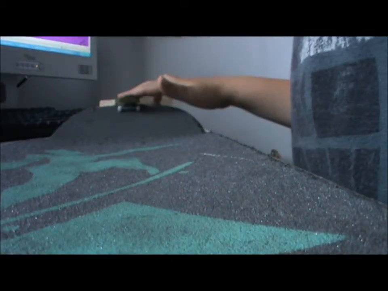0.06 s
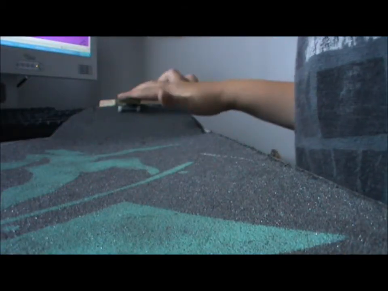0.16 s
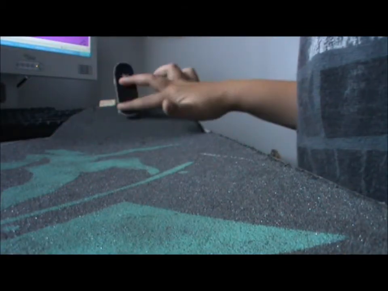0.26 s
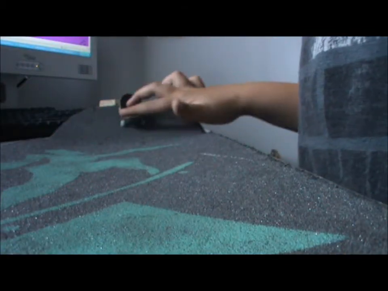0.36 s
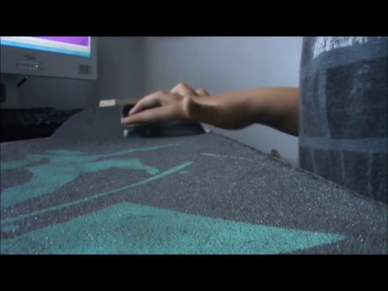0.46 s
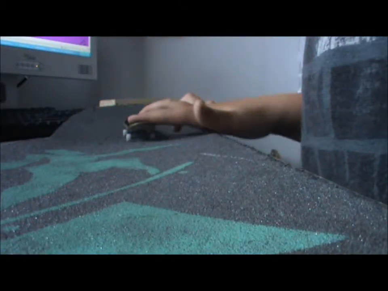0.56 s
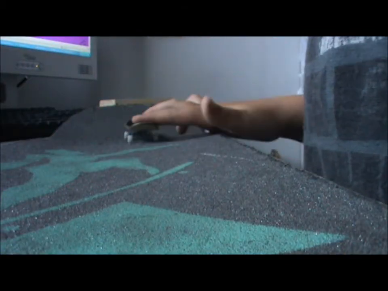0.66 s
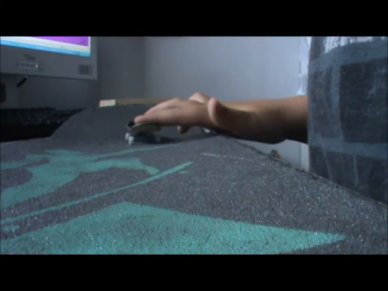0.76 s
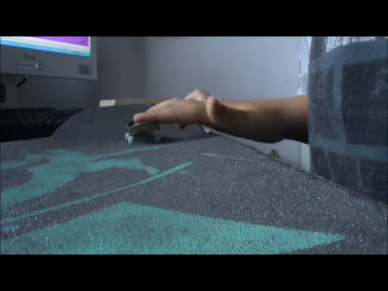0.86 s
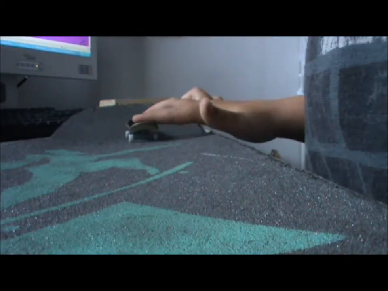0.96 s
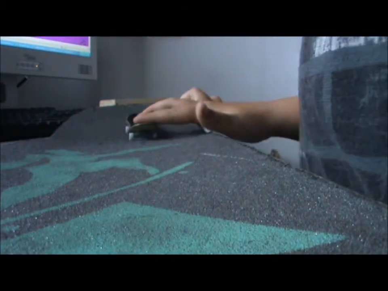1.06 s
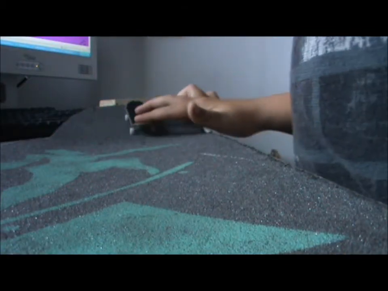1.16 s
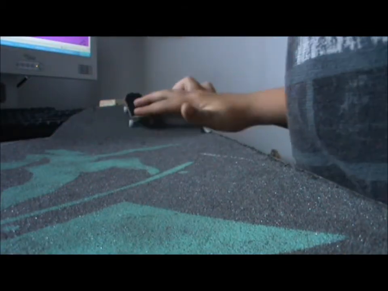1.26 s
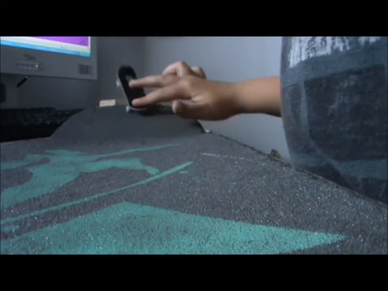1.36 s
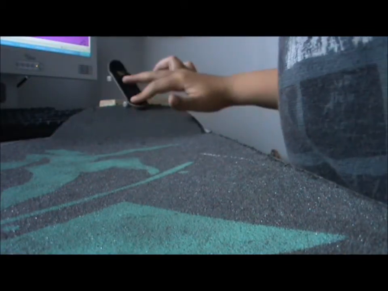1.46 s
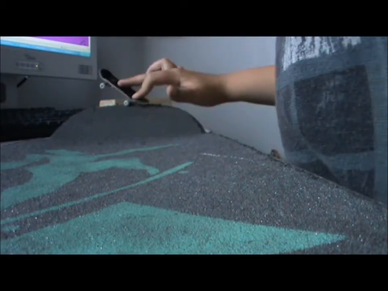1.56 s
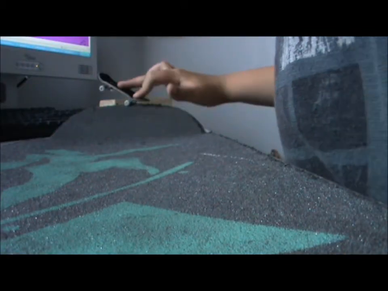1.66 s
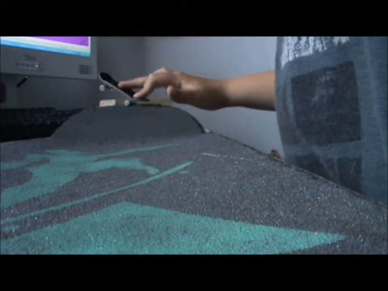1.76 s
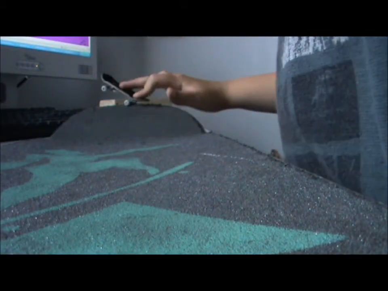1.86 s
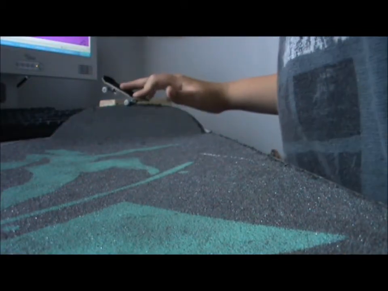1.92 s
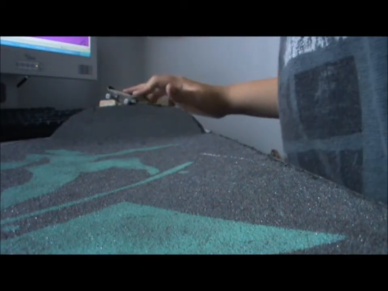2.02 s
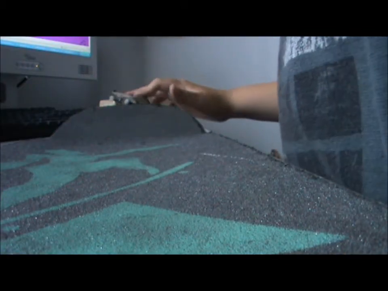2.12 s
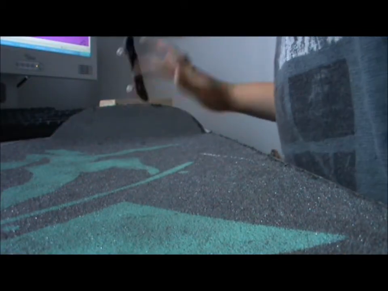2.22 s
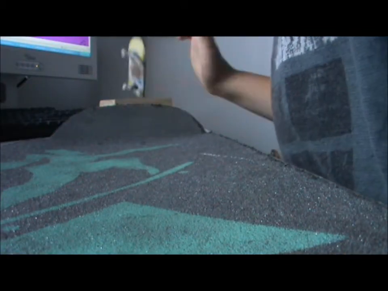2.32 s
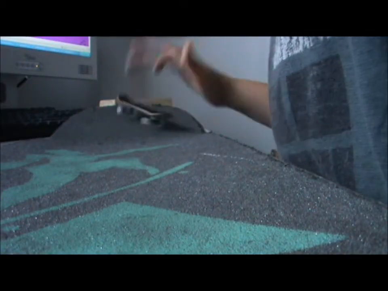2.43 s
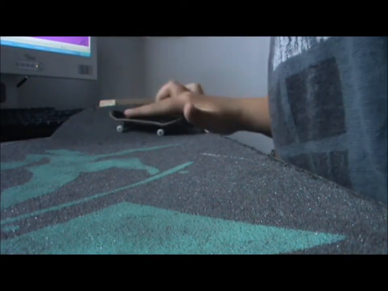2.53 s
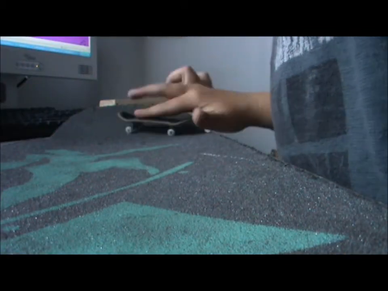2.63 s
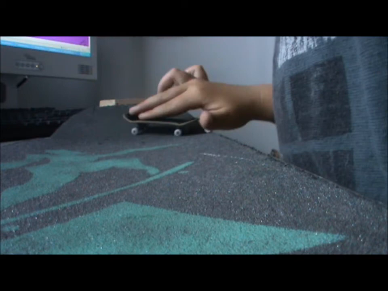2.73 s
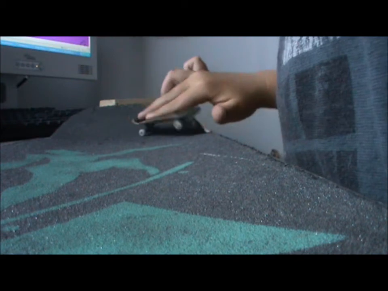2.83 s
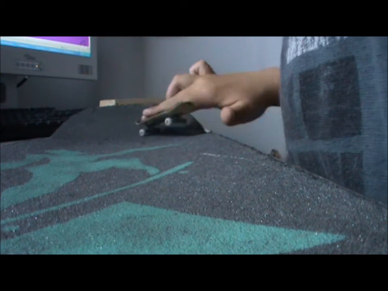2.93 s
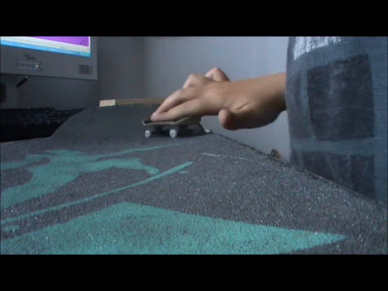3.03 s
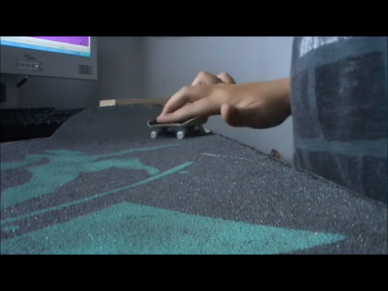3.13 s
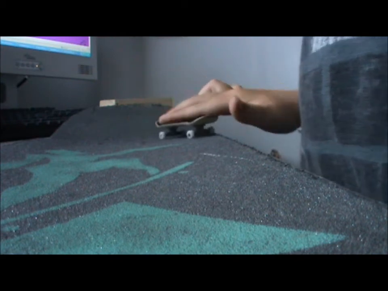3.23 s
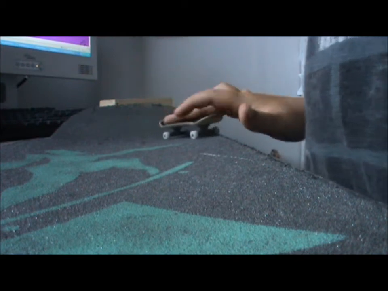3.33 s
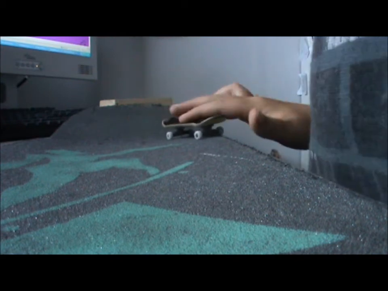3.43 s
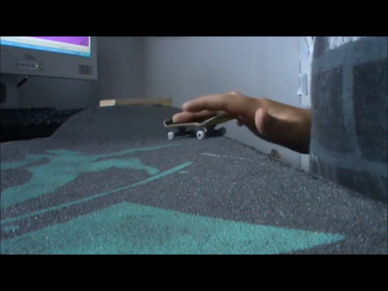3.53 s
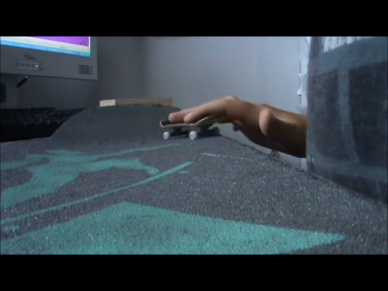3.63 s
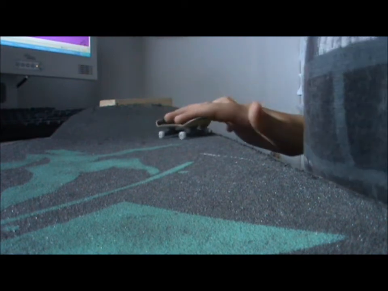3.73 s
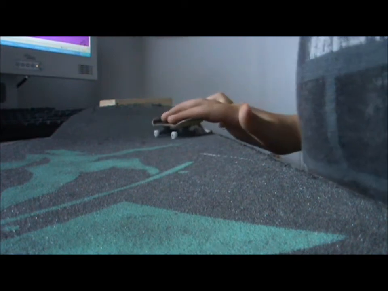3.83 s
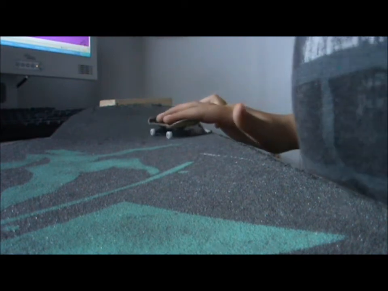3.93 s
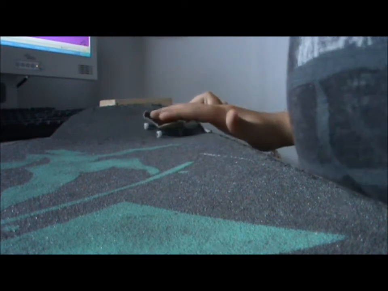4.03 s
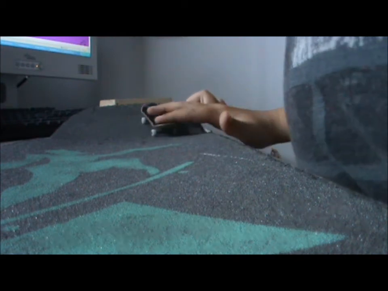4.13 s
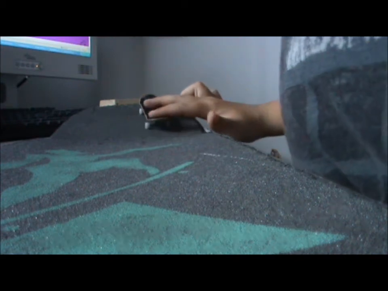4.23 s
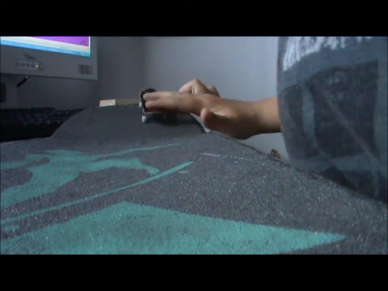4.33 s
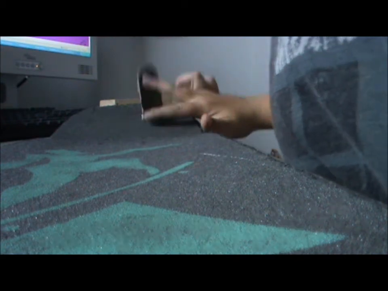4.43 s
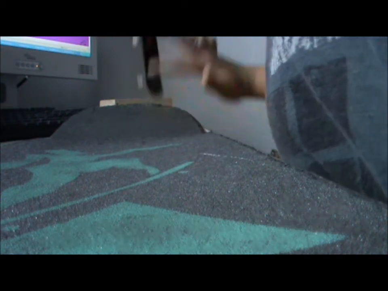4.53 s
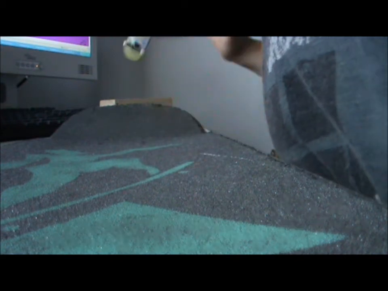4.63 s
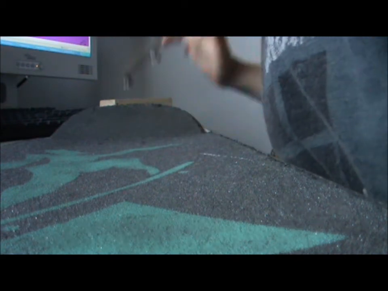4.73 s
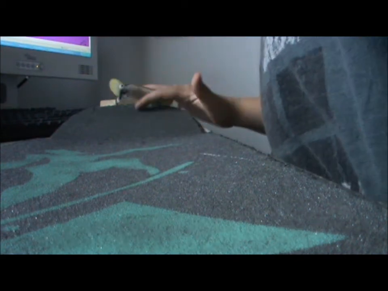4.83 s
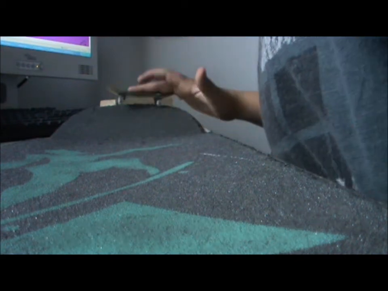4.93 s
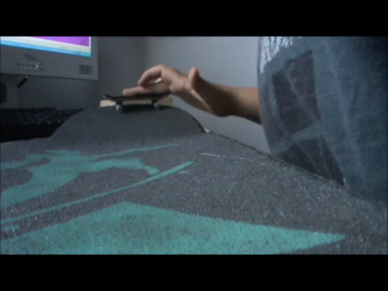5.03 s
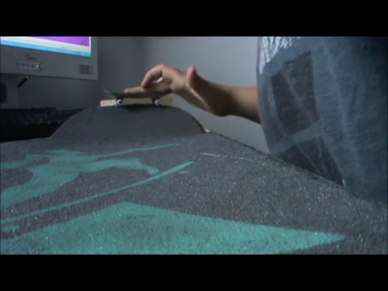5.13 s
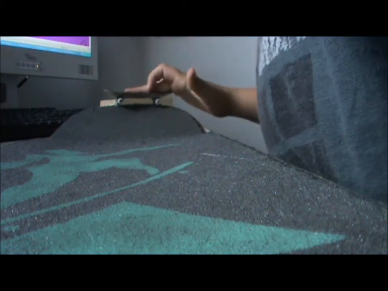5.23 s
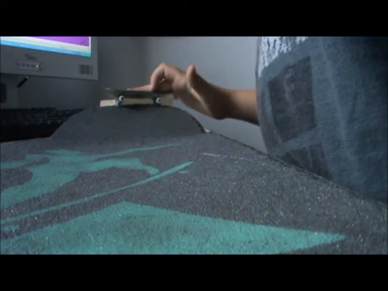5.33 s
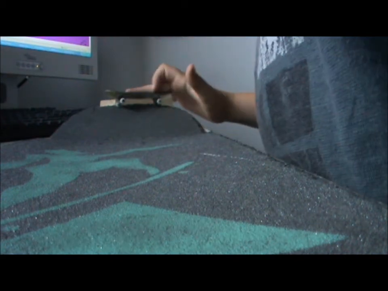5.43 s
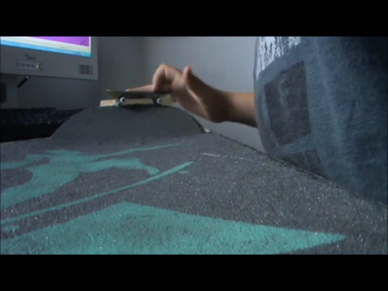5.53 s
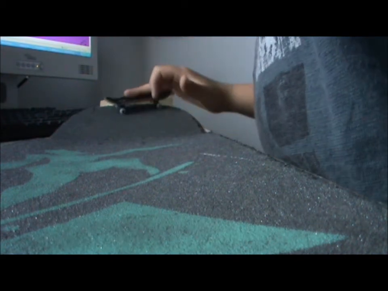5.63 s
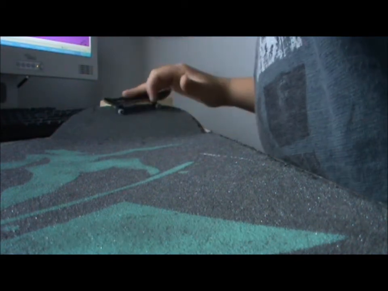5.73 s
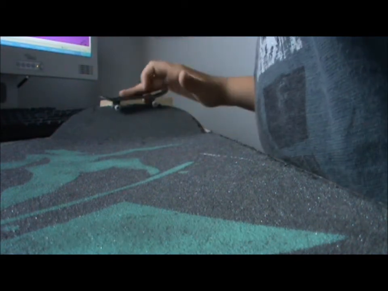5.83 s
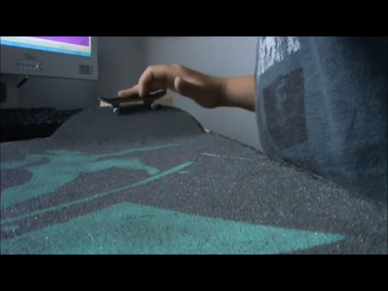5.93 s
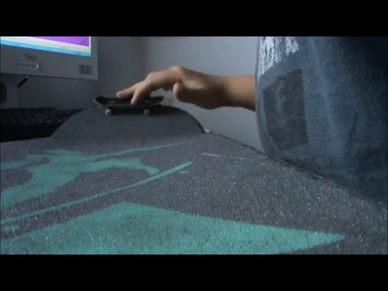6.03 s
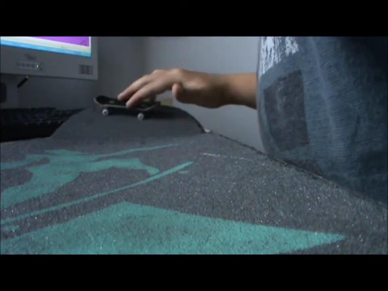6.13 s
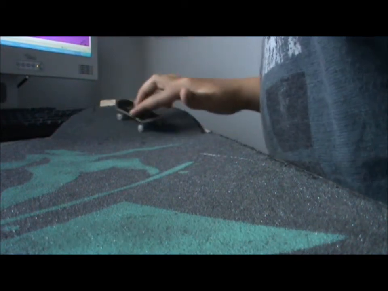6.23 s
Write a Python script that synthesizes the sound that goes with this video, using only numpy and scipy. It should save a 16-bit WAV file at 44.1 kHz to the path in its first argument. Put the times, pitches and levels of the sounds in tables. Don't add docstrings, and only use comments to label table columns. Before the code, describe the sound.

In a small quiet bedroom, fingers scuff a toy skateboard on a gritty wooden deck, then roll it to and fro in coarse rasps. Sharp clacks mark each jump and landing, followed by skids. Softer shuffling separates two bursts; a last roll cuts off. The stereo microphone lies on the deck, very close, catching low thumps and bright clicks over hum and hiss.

```python
import sys
import numpy as np
from scipy import signal
from scipy.fft import rfft, irfft
from scipy.io import wavfile
from scipy.ndimage import uniform_filter1d

SR = 44100
rng = np.random.default_rng(int(sys.argv[2]) if len(sys.argv) > 2 else 0)


def rack_gain(trim_db):
    fader = np.asarray(trim_db, float)
    return 10 ** (fader / 20)


def persist_wave(psi):
    counts = np.round(np.clip(psi, -1, 1) * 32767).astype(np.int16)
    wavfile.write(sys.argv[1], SR, np.atleast_2d(counts).T)


N = 276507


def rms_one(x):
    return x / np.sqrt(np.mean(x ** 2) + 1e-20)


def at_hz(points, hz):
    table_hz, value = np.transpose(points)
    return np.interp(np.log(hz), np.log(table_hz), value)


def drift(rate, every=1):
    r = np.exp(-80 * np.pi * rate / SR)
    noise = rng.standard_normal(N // 40 + 2002)
    slow = signal.lfilter([1], [1, -2 * r, r * r], noise)[2000:]
    return np.interp(np.arange(0, N, every) / 40, np.arange(len(slow)), rms_one(slow))


def bandpass(x, low_hz, high_hz):
    return signal.sosfilt(signal.butter(2, [low_hz, high_hz], "band", fs=SR, output="sos"), x)


def register(hz):
    edges_hz = [420, 1300, 3700]
    return np.searchsorted(edges_hz, hz)


def flex_db(s):
    # time in seconds, gain in dB.
    flex = [(0, 2.5), (.3, 2.5), (.75, -3), (1.0, 1.5), (1.45, 2.5), (2.2, -1.5), (2.7, -3), (3.3, -0.5),
            (3.45, 8), (3.7, -4), (3.95, -1), (4.08, 3.5), (4.4, 4), (4.9, 3), (5.3, -3), (5.8, 1.5),
            (6.1, -1), (6.27, -15.5)]
    return np.interp(s, *np.transpose(flex))


def pressure():
    # time in seconds, level in dB, bright share in dB.
    rolls = [
        [(0.245, -46, -27), (0.255, -28.5, -7), (0.277, -11, -8), (0.439, -10.5, -0.5), (0.45, -15, 4)],
        [(0.45, -11, -1), (0.604, -11.5, -4.5), (0.702, -19.5, -3.5), (0.726, -24.5, -7), (0.78, -22, -8),
         (0.81, -48, -8)],
        [(0.82, -44, -10), (0.832, -31, -5), (0.87, -18, -5.5), (0.912, -20.5, -2.5), (1.054, -12.5, -1),
         (1.12, -15.5, 4)],
        [(1.12, -14.5, -2), (1.228, -13, 3), (1.248, -14.5, -3), (1.316, -10.5, -1.5), (1.33, -8.5, -5.5),
         (1.414, -10.5, -6), (1.44, -20, -10)],
        [(1.44, -27, -20), (1.448, -17, -4.5), (1.468, -20, -2.5), (1.596, -36, -10), (1.636, -37.5, -18),
         (1.65, -46, -1), (1.662, -38, -23), (1.7, -57, -8)],
        [(3.61, -31, -9), (3.622, -23, -2), (3.724, -9.5, -8.5), (3.802, -22.5, -3.5), (3.838, -15, -10),
         (3.874, -13, -5.5), (3.9, -25.5, -1)],
        [(3.9, -26, -4), (3.914, -23, 0), (3.934, -16, -8), (3.986, -12, -6), (4.0, -11.5, -1),
         (4.078, -18.5, -1.5), (4.1, -19, -3)],
        [(4.1, -7.5, -1), (4.114, -11, -4.5), (4.248, -12, -4.5), (4.314, -8, -6), (4.364, -16.5, -3),
         (4.385, -28.5, -3.5), (4.451, -32.5, -4)],
        [(5.985, -22, -5), (5.997, -20.5, 0), (6.025, -16.5, -9), (6.033, -13, -2.5), (6.185, -8.5, -3.5),
         (6.27, -12.5, 5)],
    ]
    skids = [
        [(2.378, -13, -4), (2.4, -20, 3), (2.424, -23, -3.5), (2.43, -15.5, 14), (2.49, -19.5, 9),
         (2.5, -11.5, 5), (2.534, -10.5, 12), (2.604, -30.5, -1.5), (2.658, -24, -5)],
        [(2.662, -25, 5), (2.666, -14, 0), (2.674, -13, -14.5), (2.82, -25.5, -4), (2.832, -22.5, -3),
         (2.9, -26.5, -4), (2.95, -68, 5)],
        [(4.772, -17, -1), (4.806, -12, -4), (4.893, -25, -2), (4.898, -17.5, -5), (4.918, -35, -1),
         (4.954, -36, -8), (4.957, -36, -10)],
        [(4.963, -29, 5), (5.023, -20, -6.5), (5.037, -30, -7), (5.085, -32.5, -3.5), (5.109, -46, -5),
         (5.143, -35, -8), (5.16, -49, -14)],
    ]
    shuffles = [
        [(0.0, -12.5, -16.5), (0.05, -32, -4), (0.082, -24.5, -10), (0.12, -41, 7), (0.146, -46, -18),
         (0.194, -34, -8), (0.2, -31, -22)],
        [(2.98, -41, -7), (2.996, -29, -8), (3.056, -21.5, -3), (3.276, -23, -3.5), (3.29, -25, -4),
         (3.41, -26, -7.5), (3.45, -43, 11)],
        [(3.46, -48, 3), (3.47, -37, -7), (3.518, -26.5, -4.5), (3.564, -39, -10), (3.6, -42, -5)],
        [(5.668, -16, -20), (5.721, -25, -7), (5.729, -16, -10), (5.755, -31.5, -4), (5.803, -16, -13),
         (5.845, -38, 7), (5.9, -35, -10)],
        [(5.92, -36, -2), (5.928, -38, -10), (5.94, -46, -11), (5.956, -30, 2), (5.974, -26, -24),
         (5.984, -7, -24)],
    ]
    pops = [
        [(2.11, -67, -15), (2.142, -33, -11), (2.204, -30.5, -4.5), (2.221, -12.5, -25), (2.236, -28, -14),
         (2.282, -37, -19), (2.34, -45, -21)],
        [(4.452, -37, -5), (4.462, -19, -25), (4.474, -15.5, -2), (4.556, -34.5, -2), (4.648, -44.5, -11),
         (4.66, -39, -12), (4.68, -44, 4)],
    ]
    nudges = [
        [(5.187, -23.5, -4), (5.195, -32, -15), (5.225, -82, 1), (5.273, -46, -11), (5.315, -30.5, -2),
         (5.35, -62, -13)],
        [(5.355, -49, -5), (5.365, -31, 1), (5.395, -52, -24), (5.417, -25, -8), (5.44, -40.5, -11),
         (5.468, -39, 4), (5.507, -61, -25), (5.64, -50, 6)],
    ]
    thud_db, knock_db, clatter_db, snap_db = -9, -0.5, 1, -11
    slide_rasp_db, pop_rasp_db = 4.5, 13
    rasp_follows = 0.77
    t, gain = np.arange(N) / SR, np.zeros((4, N))
    kinds = [(rolls + shuffles + nudges, 0), (pops, pop_rasp_db), (skids, slide_rasp_db)]
    for strokes, rasp_db in kinds:
        for rows in strokes:
            s, level_db, bright_db = np.transpose(rows)
            bright_db = np.minimum(bright_db, -.7)
            low_db = 10 * np.log10(1 - rack_gain(2 * bright_db))
            on = (t >= s[0]) & (t <= s[-1])
            shares = (thud_db + low_db, knock_db + low_db, clatter_db + bright_db,
                      snap_db + rasp_db + rasp_follows * bright_db)
            gain[:, on] = [rack_gain(np.interp(t[on], s, level_db + share)) for share in shares]
    gain[0] *= rack_gain(flex_db(t))
    return uniform_filter1d(gain, size=66, axis=1)


def grit(per_s, spread_db, bumps_db):
    signs = rng.choice([-1, 1], (3, N))
    sizes = rack_gain(spread_db * np.minimum(rng.exponential(1, (3, N)), 5)) * signs
    clumps = rack_gain(bumps_db * (0.78 * drift(144) + 1.6 * drift(240)))
    hits = rng.random((3, N)) < per_s / SR
    return rms_one(sizes * hits * clumps) + 1e-18


def contacts():
    # time in seconds, peak in dB, weight in dB, edge in dB.
    landings = [(0.262, -18, -12, -30), (0.281, -1.5, -3, -19), (1.462, -0.5, -10.5, -22),
                (1.488, -3, -16, -13.5), (2.206, -13.5, -2, -16), (2.217, 1.5, -9, -29),
                (2.379, 2, -11, -41), (2.392, -1.5, -4.5, -13.5), (2.427, -4.5, -32, -8),
                (2.468, -8, -22, -8), (2.495, -6, -19, -10), (2.512, -3, -12, -16), (2.667, -0.5, -11, -18),
                (4.469, -10, -19, -30), (4.4744, 2, -16, -11.5), (4.773, -8.5, -23, -1.5),
                (4.797, 0, -11, -14), (4.897, -1, -12, -23), (4.963, -3, -20, -14.5),
                (4.97, -9, -24.5, -28), (4.9872, -2, -16.5, -17), (5.007, -4, -13, -24),
                (5.016, -10, -19, -23), (5.668, -7, -14.5, -6.5), (5.672, -5, -11, -41),
                (5.728, -5, -21.5, -9.5), (5.772, -13.5, -3, -11), (5.793, -1, -13, -15),
                (5.97, -13.5, -26.5, -4), (5.977, -1.5, -4, -15), (6.03, -8, -9, -11),
                (6.054, -6.5, -7, -6.5)]
    bumps = [(0.316, -2, -17, -21), (0.338, -8, -20, -4.5), (0.529, -20, -46, -27), (0.648, -11, -25, -13),
             (0.674, -18, -19, -4), (1.013, -9, -22, -18), (1.036, -14, -4, -4), (1.098, -21, 2, -29),
             (1.369, -14, -36, -3), (3.701, -16, -36, -35), (3.721, -11, -20, -26), (3.819, -7, -12, -18),
             (3.91, -10, -13, -12), (4.107, -2, -24, -31), (4.181, -7, -18, -20), (4.28, -10, -8, -24),
             (4.312, -2.5, -23.5, -37), (4.357, -9.5, -2, -21), (6.126, 0, -26, -36), (6.161, -8, -28, -20),
             (6.224, -8, -18, -13), (0.853, -32, -16, -20), (0.924, -9, 3, -15), (2.753, -2, -12, -34),
             (2.794, -18.5, -24, -9), (2.836, -10, -23, -21), (3, -17, -25, -13), (3.036, -12.5, -25, -9.5),
             (3.095, -9, -18, -28), (3.123, -9.5, -6.5, -13.5), (3.143, -10, -8, -12),
             (3.164, -8, -17, -15), (3.201, -17, -6, -7), (3.219, -7.5, -20, -15.5),
             (3.244, -11.5, -28, -21), (3.267, -11, -28, -3.5), (3.354, -13, -22, -36),
             (3.399, -12.5, -18, -18), (3.427, -24, -23, -8), (3.622, -10, -16, -34),
             (3.655, -3.5, -14.5, -22.5), (3.759, -14.5, -30.5, -10), (3.936, -3.5, -20, -14),
             (3.996, 2, -17, -27)]
    touches = [(0.055, -8.5, -14, -29), (0.079, -10.5, -18, -25), (0.211, -23, -19, -14),
               (0.748, -15, -13, -10), (0.834, -17.5, -20, -17), (1.646, -20.5, -12, -16),
               (2.131, -19.5, -15, -10), (2.146, -16, -19, -15), (2.615, -18, -22, -39),
               (2.633, -24, -5, -29), (3.517, -27, -6, -12), (5.069, -15, -3, -18), (5.091, -21, -15, -16),
               (5.132, -28, -17, -7), (5.188, -16, -14, -21), (5.294, -23, -13, -16),
               (5.364, -18.5, -11.5, -19), (5.412, -18.5, -14, -22), (5.423, -19.5, -8.5, -27),
               (5.467, -19, -13.5, -34), (5.538, -22.5, -12, -34), (5.605, -29, -15, -4.5),
               (5.925, -12, -18, -15)]
    thud_db, knock_db, clatter_db, snap_db = -10.5, 3.5, -8.5, 3.5
    flat_damps, usual_weight_db = 0.9, -13.5
    s, peak_db, weight_db, edge_db = np.transpose(landings + bumps + touches)
    shares = (thud_db + weight_db + flex_db(s),
              knock_db + weight_db - 0.65 * flex_db(s),
              clatter_db - flat_damps * (weight_db - usual_weight_db),
              snap_db + edge_db)
    return s, peak_db, *[peak_db + share for share in shares]


def blows(decay_ms, push_db, rattle_db):
    s, peak_db, *levels = contacts()
    at = (s * SR).astype(int)
    out, jolts = np.zeros((4, 3, N)), rng.standard_normal((3, N))
    for k, level_db in enumerate(levels):
        push = np.zeros(N)
        push[at] = rack_gain(level_db)
        dying = signal.lfilter([1], [1, -np.exp(-1000 / decay_ms[k] / SR)], push)
        push[at] *= rack_gain(0.42 * peak_db)
        out[k] = rack_gain(push_db[k]) * push + rack_gain(rattle_db[k]) * dying * jolts
    out[0] = signal.lfilter([.07], [1, -.975], out[0])
    return out


def favour_db(hz, place):
    if register(hz) not in (1, 2):
        return 0
    k = register(hz) - 1
    octaves = np.log2(hz / place[k])
    near = np.exp(-(octaves / 0.46) ** 2)
    return (11, 12)[k] * (near - .5)


def deck(force, wander_db):
    # pitch in Hz, width in Hz, level in dB, right minus left in dB, right phase in rad.
    deck_modes = [(142.4, 15, 0.5, 9, 0.75), (215.3, 5, -16, 25.5, 2.5), (314, 48, -11.5, 23, 0),
                  (341.8, 25.5, 15, -13.5, 1.36), (489, 12.3, -8, 15, 1.34), (524.6, 15.3, 9.5, -2, 0.86),
                  (649, 86, -5.5, 6.5, 0.94), (773.5, 33, 3.5, -2, 1.5), (908, 60, -9.5, 11, 0.8),
                  (978.4, 24, 9, 0.5, 1.57), (1095, 22, 5.5, 1, 2.5), (1143.3, 34, 1, 9.5, 4.5),
                  (1630, 67, 3.5, -2, -1.2), (1977, 108, -6, 1.5, 1.2), (2320, 27, -10, -28, -14),
                  (2600, 144, 1.5, -9.5, -1.5), (2947, 108, -4, 4.5, -0.9), (3130, 24, -10, -29, 7)]
    axle_modes = [(2272, 150, -6.5, -8, 1), (2746, 43, -12.5, 3, -0.85), (3203, 71, 3, -22, 0.45),
                  (3380, 69, -2, 0, -2.4)]
    # time in seconds, low pitch in Hz, high pitch in Hz.
    places = [
        [(0.0, 505, 1820), (0.134, 606, 2200), (0.188, 870, 2250), (0.242, 585, 2520), (0.338, 980, 2230),
         (0.73, 614, 1670), (0.8, 692, 1870)],
        [(0.81, 685, 1760), (1.17, 570, 2200), (1.232, 1030, 2800), (1.284, 940, 1840), (1.384, 666, 2350),
         (1.66, 820, 1610), (1.7, 564, 1830)],
        [(2.1, 697, 2410), (2.12, 840, 2600), (2.278, 510, 1760), (2.49, 1060, 2120), (2.744, 583, 1980),
         (2.812, 786, 2500), (2.97, 590, 1970)],
        [(2.98, 506, 2440), (3.244, 740, 2060), (3.286, 520, 2460), (3.342, 710, 1660), (3.422, 535, 2100),
         (3.522, 840, 1760), (3.6, 500, 1980)],
        [(3.61, 600, 2030), (3.79, 700, 2150), (3.814, 556, 2000), (4.14, 724, 2170), (4.234, 556, 2280),
         (4.396, 596, 2020), (4.45, 774, 2500)],
        [(4.46, 649, 3000), (4.7, 580, 1880), (4.75, 960, 2470), (4.824, 540, 2710), (4.884, 525, 2250),
         (5.012, 780, 2000), (5.16, 630, 2200)],
        [(5.17, 980, 2440), (5.304, 553, 1850), (5.39, 730, 2430), (5.612, 696, 2110), (5.83, 890, 2470),
         (5.882, 530, 2280), (5.95, 920, 2730)],
        [(5.96, 710, 2560), (6.014, 740, 1920), (6.06, 645, 2100), (6.092, 690, 1730), (6.126, 834, 1690),
         (6.21, 880, 1800), (6.27, 820, 2060)],
    ]
    chatter_db = 1.84
    stiff_ring = 0.32
    every = 32
    out, t = np.zeros((4, 2, N)), np.arange(0, N, every) / SR
    s, *pitches = np.transpose(sum(places, []))
    place = [np.interp(t, s, hz) for hz in pitches]
    for hz, width, level_db, right_db, phase in deck_modes + axle_modes:
        k = register(hz)
        pole = np.exp((-np.pi * width + 2j * np.pi * hz) / SR)
        coupling_db = level_db + wander_db * drift(8.4, every) + favour_db(hz, place)
        if hz > 1300:
            coupling_db = coupling_db + chatter_db * drift(35, every)
        if 900 < hz < 1250:
            coupling_db = coupling_db - stiff_ring * flex_db(t)
        drive = np.repeat(rack_gain(coupling_db), every)[:N] * force[k, 1:]
        front, rear = signal.lfilter([1 - abs(pole)], [1, -pole], drive)
        turn = rack_gain(right_db) * np.exp(1j * phase)
        out[k, 0] += (front + 0.072 * rear).imag
        out[k, 1] += (turn * (front + .45j * rear)).imag
    return out


def rasp(force):
    # frequency in Hz, level in dB.
    colour = [(80, -41), (140, 3), (300, 8), (1000, -6), (2500, -3), (4200, -12.5), (5400, -20.5),
              (9000, -26.5), (12500, -36.5), (16000, -75)]
    # frequency in Hz, left-right likeness from 0 to 1.
    likeness = [(100, 0.72), (300, 0.99), (1000, 1), (4000, 0.2), (7000, 0.11), (10000, 1), (14000, 0.65)]
    patchy_db, patches_per_s = 2.0, 24
    out, edges = np.zeros((4, 2, N)), 80.5 * 2 ** np.arange(0, 8.1, .5)
    for k, (low, high) in enumerate(zip(edges, edges[1:])):
        hz = np.sqrt(low * high)
        alike = np.clip(at_hz(likeness, hz), 0, 1)
        train = force[register(hz)]
        patch_db = at_hz(colour, hz) + patchy_db * drift(patches_per_s, 32)
        patches = np.repeat(rack_gain(patch_db), 32)[:N]
        both = patches * (np.sqrt(alike) * train[0] + np.sqrt(1 - alike) * train[1:])
        out[register(hz)] += (-1) ** k * bandpass(both, low, high)
    return out


def cracks():
    # time in seconds, peak in dB.
    clicks = [(0.0912, -20), (1.0345, -13), (1.219, -4), (1.3378, 0), (1.4885, -22), (2.3815, -29),
              (2.3929, 4), (2.4264, -9), (2.4937, -13), (2.6878, -11), (3.122, -13), (3.2675, -9),
              (3.519, -13.5), (4.1041, -16), (4.475, -7), (4.771, -25), (4.962, -17), (0.055, -15),
              (3.325, -16), (3.531, -20), (3.6373, -14), (6.0556, -19)]
    s, peak_db = np.transpose(clicks)
    click = np.full(N, 1e-18)
    click[(s * SR).astype(int)] = rack_gain(peak_db + 3)
    return signal.sosfilt(signal.butter(2, 8000, "high", fs=SR, output="sos"), click)


def rocking():
    # time in seconds, peak in dB.
    thumps = [(1.456, -10), (2.392, -5), (2.513, -8.5), (4.774, -11.5), (4.8, -4), (4.827, -10),
              (4.899, -6.5), (3.262, -24), (5.24, -25.5), (5.423, -19.5), (5.789, -14.5)]
    bend_hz, twist_hz, t60_s, rock_db = 136, 224.5, 0.21, -9.5
    s, peak_db = np.transpose(thumps)
    push, swing = np.full(N, 1e-18), 0
    push[(s * SR).astype(int)] = rack_gain(peak_db + rock_db)
    r = rack_gain(-60 / (t60_s * SR))
    for hz, ports in ((bend_hz, [[1], [1]]), (twist_hz, [[.7], [.3]])):
        w = 2 * np.pi * hz / SR
        swing = swing + ports * signal.lfilter([0, np.sin(w)], [1, -2 * r * np.cos(w), r * r], push)
    return bandpass(swing, 80, 320)


def loose_wheel():
    tick_s, tick_hz, tick_t60_s, tick_db = 1.8195, 1540, 0.011, -20
    squeak_s, length_s, squeak_db = 1.825, .21, -48
    squeak_hz, rise_hz, rise_s = 2370, 230, .06
    t = np.arange(N) / SR
    since = np.clip(t - squeak_s, 0, length_s)
    hz = squeak_hz - rise_hz * np.exp(-since / rise_s)
    swell = np.sqrt(np.sin(np.pi * since / length_s) + 1e-9) * (since > 0) * (since < length_s)
    swell = swell * rack_gain(squeak_db + 0.8 * drift(25.0))
    squeak = swell * np.sin(2 * np.pi * np.cumsum(hz) / SR)
    after = np.maximum(t - tick_s, 0)
    fade = rack_gain(tick_db - 60 * after / tick_t60_s) * np.minimum(after / 0.00074, 1)
    return squeak + fade * np.sin(2 * np.pi * tick_hz * after)


def room(x):
    t60_s, room_db = 0.078, -16
    t = np.arange(SR // 3) / SR
    tail = rng.standard_normal((2, len(t))) * rack_gain(-60 * t / t60_s) * (t > .004)
    tail = signal.lfilter([1], [1, -.8], tail)
    tail = tail / np.sqrt(np.sum(tail ** 2, axis=1, keepdims=True))
    return rack_gain(room_db) * signal.fftconvolve(x, tail, axes=1)[:, :N]


def rumble():
    # time in seconds, level in dB.
    load = [(0.0, -51.5), (0.23, -58), (0.279, -52), (0.75, -65), (1.53, -38), (1.619, -78), (2.09, -78),
            (2.22, -28), (2.32, -49), (2.46, -30), (2.83, -47.5), (4.49, -39), (4.7, -79), (4.79, -19),
            (5.17, -63), (5.59, -72), (5.69, -39), (6.27, -55)]
    shared, left, right = bandpass(rng.standard_normal((3, N)), 22, 90)
    level_db = np.interp(np.arange(N) / SR, *np.transpose(load)) + 2.0 * drift(4.8)
    return rack_gain(level_db - 7.0) * rms_one(shared + 1.1 * np.array([left, right]))


def hum():
    # frequency in Hz, level in dB per Hz.
    colour = [(15, -55), (25, -17), (138, 4.5), (250, 2), (1140, -2), (1240, -4), (1340, -7), (1760, -4),
              (2500, -7.5), (3460, -10.5), (3960, -12.5), (16200, -29.5)]
    # frequency in Hz, left-right likeness from 0 to 1.
    likeness = [(60, 0.97), (180, 1), (550, 0.91), (1650, 0.4), (4970, 0.37), (15000, 0.91)]
    hz = np.fft.rfftfreq(N, 1 / SR) + 1
    mid, side = rfft(rng.standard_normal((2, N))) * rack_gain(at_hz(colour, hz))
    alike = np.clip(at_hz(likeness, hz), 0, 1)
    pair = np.sqrt(1 + alike) * mid + np.sqrt(1 - alike) * side * [[1], [-1]]
    return rack_gain(-41.5) * rms_one(irfft(pair, N))


def scene():
    rolling = pressure()
    grains = rolling[:, None] * grit(per_s=6000.0, spread_db=3.5, bumps_db=1.0)
    clacks = blows([15.2, 2.85, 2.18, 2.8], push_db=[10.4, 19.0, 3.9, 14.0], rattle_db=[0.3, 3.2, 1.5, 3.5])
    ringing = deck(grains + clacks, wander_db=3.0)
    ticks = rolling[:, None] * grit(per_s=400.0, spread_db=3.8, bumps_db=2.5)
    parts = rasp(rack_gain(-10.0) * grains + rack_gain(-16.5) * ticks + rack_gain(-14.0) * clacks)
    top_cut = signal.butter(8, 3680, fs=SR, output="sos")
    parts[:3] = signal.sosfilt(top_cut, (parts + ringing)[:3])
    toy = sum(rms_one(part) * np.sqrt(np.mean(gain ** 2)) for part, gain in zip(parts, rolling))
    toy = rack_gain(-0.5) * signal.sosfilt(signal.butter(6, 112, "high", fs=SR, output="sos"), toy)
    toy = signal.lfilter(*signal.iirnotch(1300, 6.0, fs=SR), toy)
    shake = rack_gain(-16.0) * bandpass(clacks[0, 1:], 25, 95)
    return toy + room(toy) + shake + hum() + loose_wheel() + rocking() + cracks() + rumble()


def band_limit(x):
    return signal.sosfilt(signal.butter(12, 16350, fs=SR, output="sos"), x)


def record(dry):
    rounded = 1.05 * np.tanh(dry / 1.05)
    dull = signal.sosfilt(signal.cheby2(10, 50, 16400, fs=SR, output="sos"), rounded)
    return band_limit(dull)


dry = scene()
out = record(dry)
persist_wave(out)
```